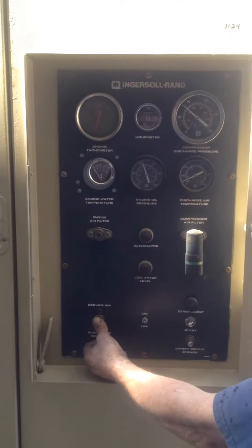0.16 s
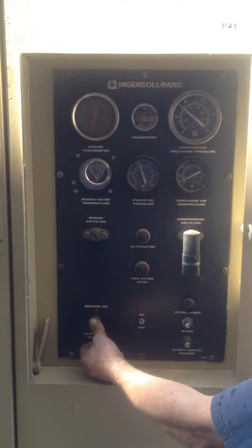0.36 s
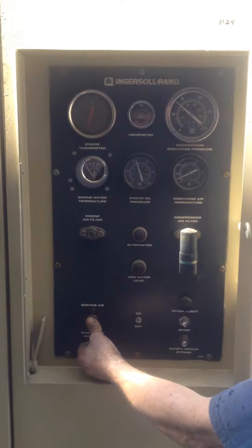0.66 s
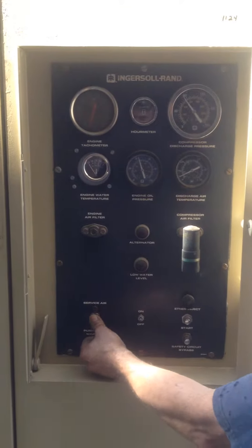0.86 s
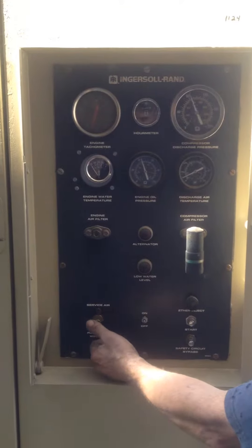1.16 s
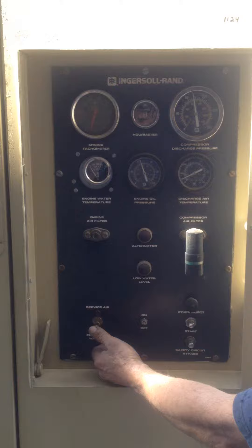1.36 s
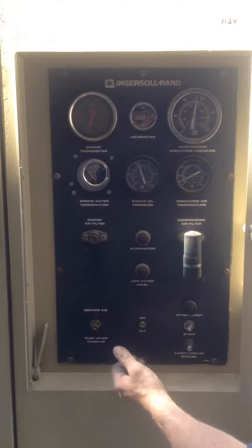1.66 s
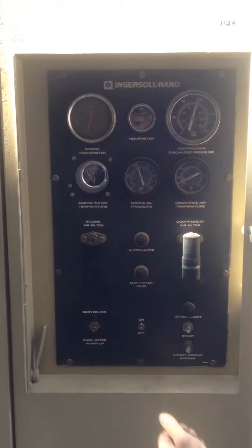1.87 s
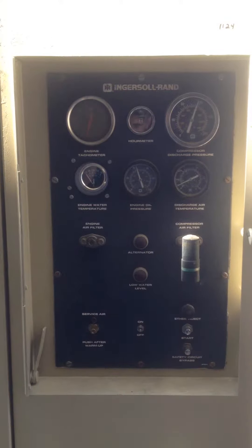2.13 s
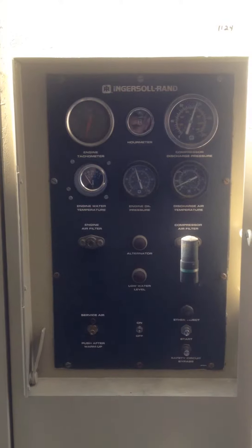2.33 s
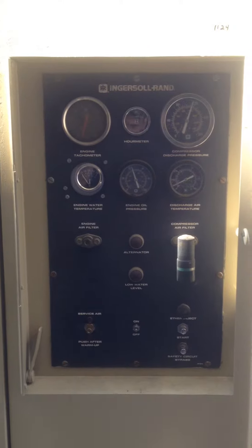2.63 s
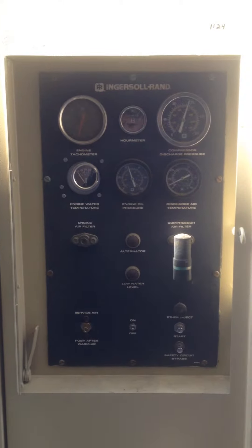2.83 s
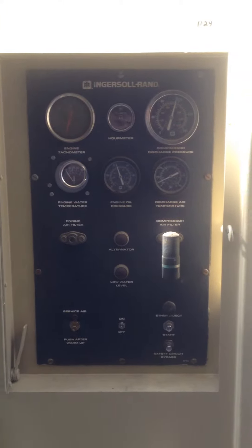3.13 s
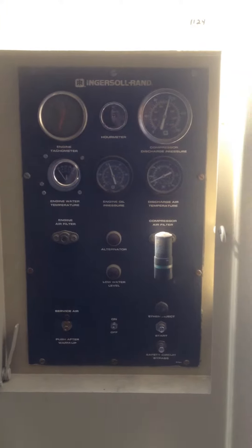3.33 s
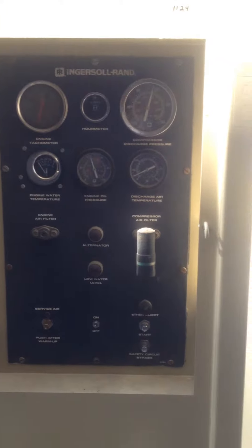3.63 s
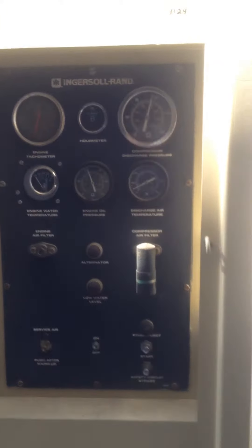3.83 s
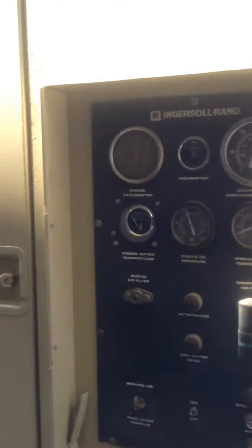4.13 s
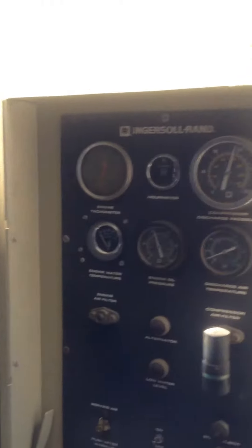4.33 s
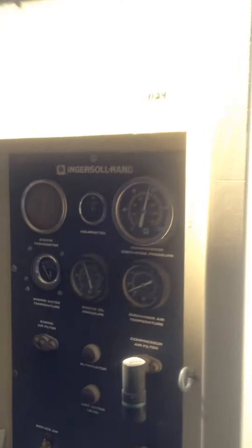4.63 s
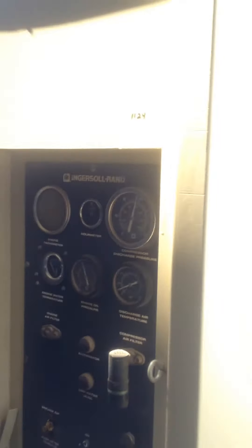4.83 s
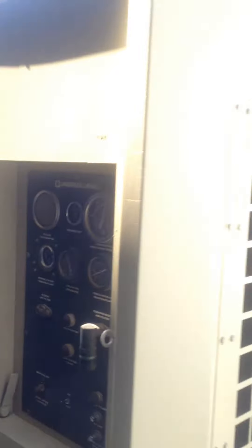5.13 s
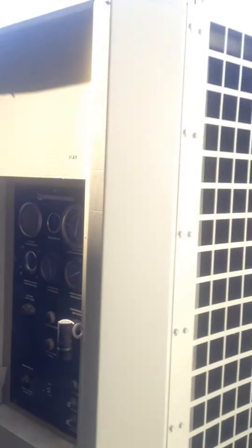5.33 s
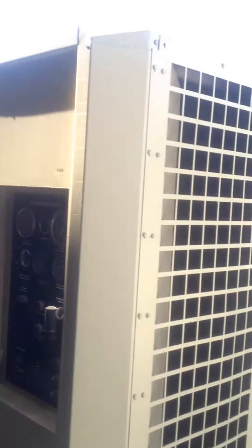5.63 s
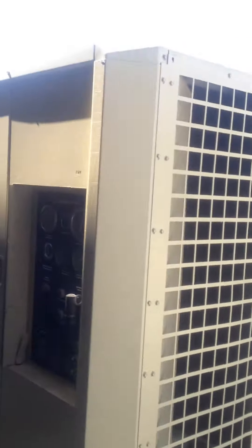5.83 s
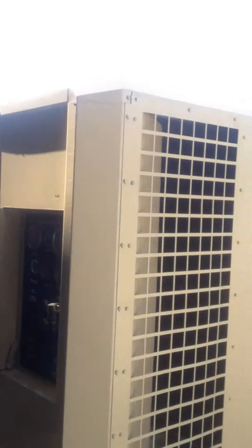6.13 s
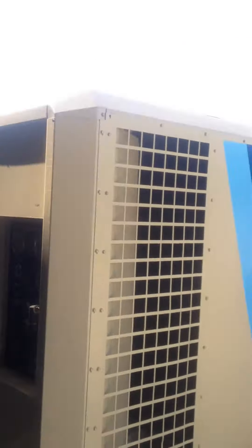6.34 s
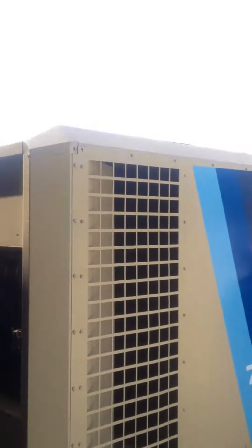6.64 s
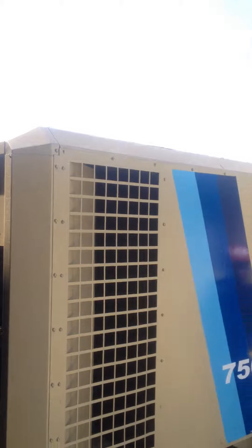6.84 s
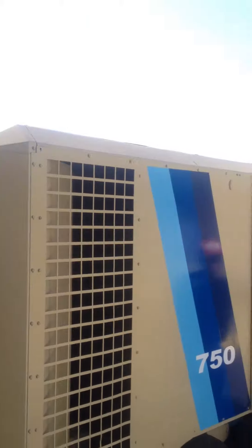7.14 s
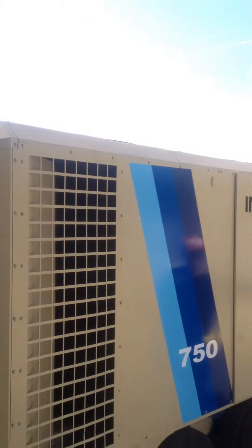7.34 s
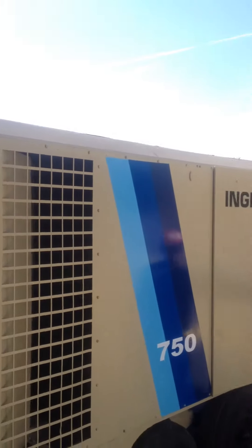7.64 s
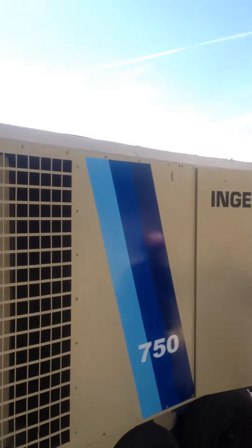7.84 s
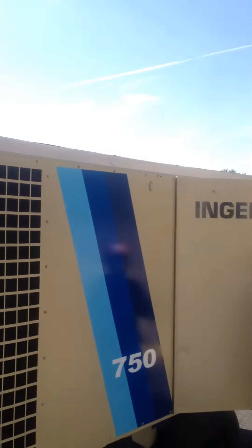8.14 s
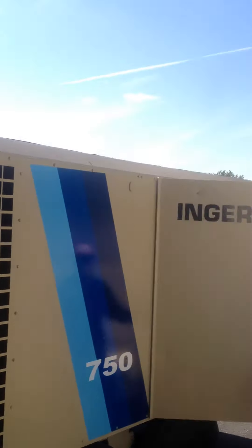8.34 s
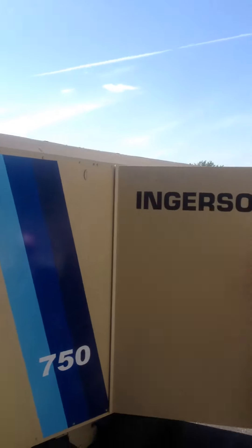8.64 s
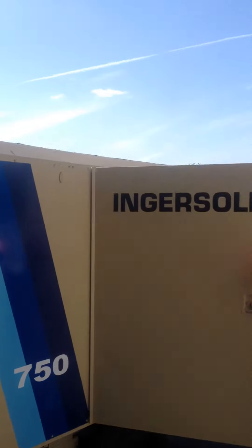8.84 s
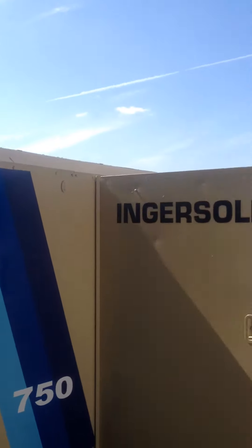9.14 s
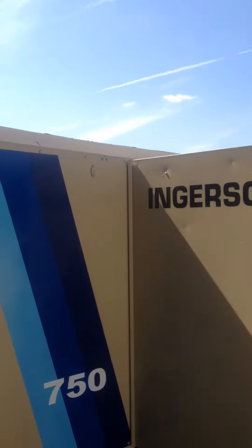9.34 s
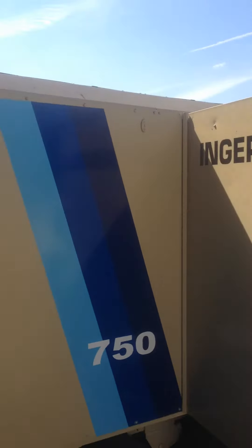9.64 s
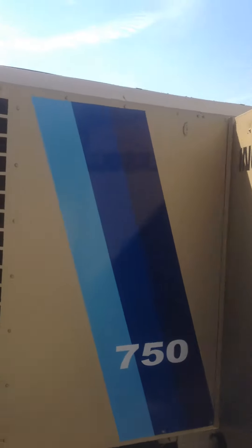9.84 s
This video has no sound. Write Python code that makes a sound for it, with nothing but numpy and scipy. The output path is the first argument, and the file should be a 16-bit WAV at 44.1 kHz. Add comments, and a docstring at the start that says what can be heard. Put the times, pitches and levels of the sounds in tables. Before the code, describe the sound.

A large diesel air compressor is already running at a steady speed outdoors, heard close at its panel: a deep, booming low hum with wavering, beating tones, fan and exhaust rumble, and a faint dull clatter. From about 1.2 seconds the engine swells for half a second, pitch rising slightly to around 1.7, with a thin wavering intake hiss; it then drops below its former speed and recovers by 2.3. Steady droning follows with a little fine cooling-air hiss. At about 4.1 a valve suddenly blows off compressed air, a loud, bright, shrieking hiss over a rough roar, holding until 4.8, then dulling and dying away by 5.3. The drone returns. As the microphone moves past the cooler grille and along the side, from 5.5 to 10, the colour shifts, clatter opens up, airy hiss peaks near 8.2, and the rumble grows fuller toward the end.

```python
"""On an open site, a six-cylinder diesel air compressor runs in its steel canopy.
Crank-locked tones, shaped-noise roar and knock, and cooling-air hiss sound throughout.
The engine surges briefly as the load comes on, with a wavering intake hiss; later a valve
blows off air for a second, as hiss over a roar. The listener walks from the control panel
round to the cooler grille and along the side, shifting levels, colour and echo delays."""
import sys
import numpy as np
from scipy import signal
from scipy.fft import rfft, irfft, next_fast_len
from scipy.io import wavfile
from scipy.ndimage import uniform_filter1d

SR = 44100
rng = np.random.default_rng(int(sys.argv[2]) if len(sys.argv) > 2 else 0)


def waveform_to_disk(signal):
    """Save audio, clipped to [-1, 1], as 16-bit WAV at the path in sys.argv[1]."""
    frames = np.transpose(np.atleast_2d(signal))
    scaled = np.clip(frames, -1, 1) * 32767
    samples = np.round(scaled).astype(np.int16)
    wavfile.write(sys.argv[1], SR, samples)


def voltage_ratio(level):
    """Linear amplitude factor for a level in decibels (scalar or array-like)."""
    return 10 ** (np.asarray(level, float) / 20)


N = 440559

# third-octave band centres: centre_hz
THIRD_OCTAVES_HZ = 22 * 2 ** np.arange(0, 9.7, 1 / 3)


def rms_one(x):
    """Scale to unit rms."""
    return x / np.sqrt(np.mean(x ** 2) + 1e-20)


def in_time(rows):
    """Interpolate the columns of a time table to one value per sample."""
    s, *columns = np.transpose(rows)
    return [np.interp(np.arange(N) / SR, s, c) for c in columns]


def at_hz(points, hz):
    """Read a spectrum in dB on a log frequency axis."""
    points_hz, points_db = np.transpose(points)
    return np.interp(np.log(hz), np.log(points_hz), points_db)


def drift(rate_hz):
    """Slow random wander of spread 1: noise through a double pole at rate_hz."""
    hop = 40   # samples between values
    pole = np.exp(-2 * np.pi * hop * rate_hz / SR)
    noise = rng.standard_normal(N // hop + 2002)
    slow = signal.lfilter([1], [1, -2 * pole, pole * pole], noise)[2000:]   # skip the settling
    return np.interp(np.arange(N) / hop, np.arange(len(slow)), rms_one(slow))


def coloured(spectrum):
    """White noise given a spectrum, silent outside it; rms 1."""
    size = next_fast_len(N)
    hz = np.maximum(np.fft.rfftfreq(size, 1 / SR), 1)
    inside = (hz >= spectrum[0][0]) & (hz <= spectrum[-1][0])
    shaped = rfft(rng.standard_normal(size)) * voltage_ratio(at_hz(spectrum, hz)) * inside
    return rms_one(irfft(shaped, size)[:N])


def bands(x, centres_hz, count):
    """Overlapping slices, count to the octave, that add up to x between the end centres."""
    size = next_fast_len(N)
    spectrum = rfft(x, size)
    hz = np.maximum(np.fft.rfftfreq(size, 1 / SR), 1)
    for centre_hz in centres_hz:
        steps = np.clip(count * np.log2(hz / centre_hz), -1, 1)
        yield centre_hz, irfft(spectrum * np.cos(np.pi / 2 * steps) ** 2, size)[:N]


def patchy(x, low_hz, patchy_db):
    """Sixth-octave bands from low_hz up swell and sink slowly, each on its own."""
    centres_hz = low_hz * 2 ** (np.arange(20) / 6)
    return sum(voltage_ratio(patchy_db * drift(1.0)) * band for hz, band in bands(x, centres_hz, count=6))


def crank_angle(firing_hz):
    """Crank angle in radians, at three firings a turn."""
    return 2 * np.pi * np.cumsum(firing_hz / 3) / SR


def surge():
    """Load envelope, 0 to 1: rise, hold, fall."""
    start_s, rise_s, hold_s, fall_s = 1.18, 0.094, 0.31, 0.15
    corners_s = start_s + np.cumsum([0, rise_s, hold_s, fall_s])
    return np.interp(np.arange(N) / SR, corners_s, [0, 1, 1, 0])


def tones(firing_hz, place):
    """Wavering lines locked to the crank; the belt-driven fan beats against the sixth order."""
    # exhaust orders, compressor rotor lobes, gear teeth: multiple of crank speed
    multiples = [3, 6, 7, 8, 9, 12, 15, 18, 21, 24, 25.5, 5.055, 10.11, 20.2, 40, 43, 49.4, 70.45]
    # relative tone levels at the panel and at the side, one per multiple: level_db
    panel_levels_db = [-59, -32.5, -43.5, -43.5, -39, -45.5, -47.5, -57, -46, -56.5, -52, -45, -37.5, -44.5,
                       -49, -54.5, -60, -61]
    side_levels_db = [-42, -41, -43.5, -33, -31.5, -44, -53, -47.5, -48, -61, -59, -46.5, -36.5, -54, -55,
                      -52.5, -59, -60]
    fan_multiple, fan_panel_db, fan_side_db = 6.1313, -36, -46.5
    governed_firing_hz = 68.4
    drift_db, drift_hz = 1.97, 3.0

    crank = crank_angle(firing_hz)
    off_speed_hz = np.abs(firing_hz - governed_firing_hz)
    phases = rng.uniform(0, 2 * np.pi, len(multiples))
    phases[multiples.index(6)] = 0   # starts in step with the fan
    out = voltage_ratio(fan_panel_db + place * (fan_side_db - fan_panel_db)) * np.cos(fan_multiple * crank)
    for multiple, panel_db, side_db, phase in zip(multiples, panel_levels_db, side_levels_db, phases):
        fade_db = 0.23 * max(multiple - 6, 0) * off_speed_hz   # high multiples fade off governed speed
        level_db = panel_db + place * (side_db - panel_db) - fade_db
        out += voltage_ratio(level_db + drift_db * drift(drift_hz)) * np.cos(multiple * crank + phase)
    return np.sqrt(2) * out


def roar(place):
    """Fan and exhaust turbulence booming in the canopy; its colour changes along the walk."""
    # noise spectrum at the panel: pitch_hz, relative level_db (per Hz)
    panel_spectrum = [(20, -44), (55, -35), (75, -19.5), (95, -9), (120, -4.5), (160, -4), (200, -2.5),
                      (250, -11), (290, -8.5), (340, -11.5), (420, -15.5), (480, -19), (640, -22),
                      (1100, -27.5), (3000, -51)]
    # noise spectrum at the side: pitch_hz, relative level_db (per Hz)
    side_spectrum = [(20, -34), (55, -36), (75, -21.5), (100, -26), (125, -15), (160, -9.5), (210, 0.5),
                     (270, -5), (315, -11.5), (400, -17.5), (480, -20.5), (560, -24), (960, -29),
                     (1650, -37.5), (3000, -63.5)]
    drift_db, drift_hz = 2.02, 2.74
    rumble = np.sqrt(1 - place) * coloured(panel_spectrum) + np.sqrt(place) * coloured(side_spectrum)
    slices = bands(rumble, THIRD_OCTAVES_HZ[:23], count=3)
    return sum(voltage_ratio(drift_db * drift(drift_hz)) * band for hz, band in slices)


def knock(firing_hz, depth=0.14):
    """Combustion clatter, slightly louder or softer for each cylinder as it fires; rms 1."""
    # knock strength in firing order, before depth scales it: level_db
    cylinders_db = [1.5, -6.5, -3, -2.5, -0.8, -6.5]
    # clatter spectrum: pitch_hz, relative level_db (per Hz)
    clatter_spectrum = [(700, -31), (1200, -9), (1900, -9), (2900, -17), (4300, -21), (5200, -26.5),
                        (6500, -34.5), (9000, -46.5), (12000, -82)]
    firing = np.cumsum(firing_hz) / SR
    strength = voltage_ratio(np.array(cylinders_db))[firing.astype(int) % 6]
    strength = uniform_filter1d(strength, size=300)   # samples
    clatter = patchy(coloured(clatter_spectrum), 900, patchy_db=0.6)
    return rms_one(clatter * (1 - depth + depth * strength))


def cooling():
    """Air through the cooler core: fine hiss, and a bright band sliding with the angle to the grille."""
    # hiss reaching the listener: start_s, level_db
    hiss_levels = [(.85, -75.5), (.9, -88), (1.7, -79), (1.9, -69.5), (4, -71), (5.3, -66), (6.0, -67),
                   (6.6, -65), (6.85, -64.5), (8.2, -63), (8.45, -64), (8.9, -66.5), (9.6, -70)]
    # hiss spectrum: pitch_hz, relative level_db (per Hz)
    hiss_spectrum = [(3240, -29), (5500, -1.5), (6340, -4.5), (7430, -9), (8780, -10), (9650, -12.5),
                     (13900, -8), (15400, -3.5)]
    # bright band: start_s, centre_hz
    bright_centres = [(4.5, 13960), (6.2, 12560), (8.8, 14600)]
    bright_base_db, hiss_ref_db, growth_db_per_db = -87.5, -70.5, 3.1
    bright_width_hz, drift_db, drift_hz = 1250, 1.8, 2.2

    level_db, = in_time(hiss_levels)
    centre_hz, = in_time(bright_centres)
    bright_db = bright_base_db + growth_db_per_db * (level_db - hiss_ref_db)
    bright_db = np.maximum(bright_db, level_db - 12.5)
    bright = 0
    for hz, band in bands(rng.standard_normal(N), 10700 * 2 ** (np.arange(11) / 20), count=20):
        near_centre = np.exp(-((hz - centre_hz) / bright_width_hz) ** 2)
        bright = bright + near_centre * voltage_ratio(drift_db * drift(drift_hz)) * band
    hiss = patchy(coloured(hiss_spectrum), 2580, patchy_db=1.5)
    return voltage_ratio(level_db) * hiss + voltage_ratio(bright_db) * rms_one(bright)


def intake(load):
    """Narrow, wavering hiss from the air intake while the load comes on."""
    centre_hz, half_width_hz = 4440, 330
    level_db, waver_db, waver_hz = -69.5, 1.5, 15.0
    hiss = coloured([(centre_hz - half_width_hz, -15), (centre_hz, 0), (centre_hz + half_width_hz, -15)])
    return load * voltage_ratio(level_db + waver_db * drift(waver_hz)) * hiss


def blow_off():
    """Compressed-air jet: hiss that shrieks at full flow and dulls as pressure falls, over a roar."""
    # valve air flow, as hiss before tilt and shriek: start_s, level_db
    flow = [(4.04, -70), (4.1, -37), (4.16, -20.5), (4.26, -21.5), (4.76, -21), (4.88, -29.5),
            (4.94, -41.5), (5.16, -54), (5.26, -63)]
    # jet hiss spectrum before tilt and shriek: pitch_hz, relative level_db (per Hz)
    hiss_spectrum = [(1800, -23), (2800, -13.5), (4100, -7), (5300, -8.5), (6500, -6.5), (8500, -14.5),
                     (10800, -22.5), (13000, -20.5), (15350, -17.5)]
    # jet roar spectrum: pitch_hz, relative level_db (per Hz)
    roar_spectrum = [(88, -35.5), (150, -5), (177, -7.5), (227, 3), (277, -6), (463, -8.5), (692, -13.5),
                     (1110, -9.5), (1330, -15), (3000, -19.5), (3900, -53), (6600, -120)]
    full_flow_db, full_range_db = -22.5, 14   # jet half formed at full_flow_db; range from none to full
    pressure_peak_s = 4.52
    tilt_db_per_octave, tilt_fall_db_per_s = 1.8, 25
    shriek_hz, shriek_width_octaves = 6600, 0.56
    full_shriek_db, shriek_fall_db_per_s, weak_shriek_db = 5.5, 30, -3.5
    roar_lead_db, roar_tail_db = 15, -4.5   # roar over hiss; its change after peak pressure
    roar_top_db, roar_sag_db_per_s = -16, 7   # ceiling on the roar
    flicker_db, flicker_hz, drift_db, drift_hz = 0.7, 19.0, 0.73, 2.3

    hiss_db, = in_time(flow)
    now_s = np.arange(N) / SR
    opens_s, shuts_s = flow[0][0], flow[-1][0]
    sounding = np.interp(now_s, [opens_s - 0.04, opens_s, shuts_s, shuts_s + 0.06], [0, 1, 1, 0])
    formed = np.clip(0.5 + (hiss_db - full_flow_db) / full_range_db, 0, 1)
    falling_s = np.maximum(now_s - pressure_peak_s, 0)
    tilt_db = formed * (tilt_db_per_octave - tilt_fall_db_per_s * falling_s)
    extra_db = full_shriek_db - weak_shriek_db - shriek_fall_db_per_s * falling_s
    shriek_db = weak_shriek_db + formed * np.maximum(extra_db, 0)
    roar_db = hiss_db + roar_lead_db + roar_tail_db * (falling_s > 0)
    roar_db = np.minimum(roar_db, roar_top_db - roar_sag_db_per_s * (now_s - opens_s))

    hiss = 0
    for hz, band in bands(coloured(hiss_spectrum), THIRD_OCTAVES_HZ[17:], count=3):
        shriek = np.exp(-(np.log2(hz / shriek_hz) / shriek_width_octaves) ** 2)
        band_db = tilt_db * np.log2(hz / 4000) + shriek_db * shriek
        hiss = hiss + voltage_ratio(band_db + flicker_db * drift(flicker_hz)) * band
    jet = voltage_ratio(hiss_db) * hiss + voltage_ratio(roar_db) * coloured(roar_spectrum)
    return sounding * voltage_ratio(drift_db * drift(drift_hz)) * jet


def reflect(x, place):
    """Echoes off ground and steel panels; delays follow the walk, so the comb they draw slides."""
    # echoes: panel_delay_ms, side_delay_ms, level_db (re direct sound)
    echoes = [(2.3, 1.6, -20), (7.9, 8.9, -16.5), (17.3, 15.6, -15)]
    now = np.arange(N)
    smooth = uniform_filter1d(place, size=SR)
    total, power = x, 1
    for panel_ms, side_ms, level_db in echoes:
        delay_ms = panel_ms + smooth * (side_ms - panel_ms)
        total = total + voltage_ratio(level_db) * np.interp(now - SR / 1000 * delay_ms, now, x)
        power += voltage_ratio(2 * level_db)
    return total / np.sqrt(power)


def resonate(x):
    """Ringing of panel recess and microphone port: each resonance lifts or dips a bell-shaped band."""
    # resonances: centre_hz, width_hz, lift_db
    resonances = [(605, 17, 0.5), (830, 100, 1.5), (1097, 66, 3.5), (1504, 70, 0.5), (1698, 330, 3),
                  (2600, 220, 2), (3250, 490, 1), (3860, 420, 3), (4460, 390, 1.5), (5266, 270, -0.5),
                  (6120, 420, 3), (6900, 320, 2), (8300, 460, 2.5), (9250, 300, -0.5)]
    size = next_fast_len(N + SR // 4)
    hz = np.fft.rfftfreq(size, 1 / SR)
    total_db = sum(lift_db / (1 + (2 * (hz - centre_hz) / width_hz) ** 2)
                   for centre_hz, width_hz, lift_db in resonances)
    return irfft(rfft(x, size) * voltage_ratio(total_db), size)[:N]


def scene():
    """All sources at one microphone, their levels set by walk and load."""
    # engine speed: start_s, firing_hz
    speed = [(0, 69.3), (1.2, 69.3), (1.45, 70.8), (1.68, 73.0), (1.8, 67.0), (1.95, 66.3), (2.3, 68.3),
             (4.5, 68.3), (6.7, 68.05), (8.2, 68.4), (10, 68.4)]
    # listener's walk: start_s, place (0 panel to 1 side), nearness_db
    walk = [(0, 0.034, 0.24), (2.0, 0.073, -0.26), (3.4, 0.17, -0.4), (4.2, 0.13, 0), (5.5, .28, -0.8),
            (6.2, 0.31, -2), (6.7, 0.86, -0.8), (7.2, 0.5, -3), (7.6, 0.85, -0.4), (8.4, .82, 1.1),
            (9.2, 0.95, 2.5), (9.9, 0.53, 3.5)]
    firing_hz, = in_time(speed)
    place, near_db = in_time(walk)
    place = np.clip(place, 0, 1)
    load = surge()
    roar_db = -26.5 + near_db + 2.8 * load
    tones_db = 2.5 - 3.5 * place + 0.49 * near_db + 2.5 * load
    knock_db = -58 + 6 * place ** 0.45 + 3 * load   # opens up out of the panel recess
    engine = voltage_ratio(roar_db) * roar(place) + voltage_ratio(knock_db) * knock(firing_hz)
    noises = engine + cooling() + intake(load) + blow_off()
    mix = voltage_ratio(tones_db) * tones(firing_hz, place) + resonate(reflect(noises, place))
    return mix[None, :]


def top_cut(x):
    """Nothing passes above the cut-off."""
    return signal.sosfilt(signal.butter(12, 16170, fs=SR, output="sos"), x)


def record(dry):
    """The microphone adds its own faint hiss."""
    # microphone hiss spectrum: pitch_hz, relative level_db (per Hz)
    self_noise = [(5000, -8), (9000, -5), (12000, 3), (15350, 1.5)]
    self_noise_db = -80.5
    mix = dry + voltage_ratio(self_noise_db) * coloured(self_noise)
    return top_cut(mix)


dry = scene()
out = record(dry)
waveform_to_disk(out)
```